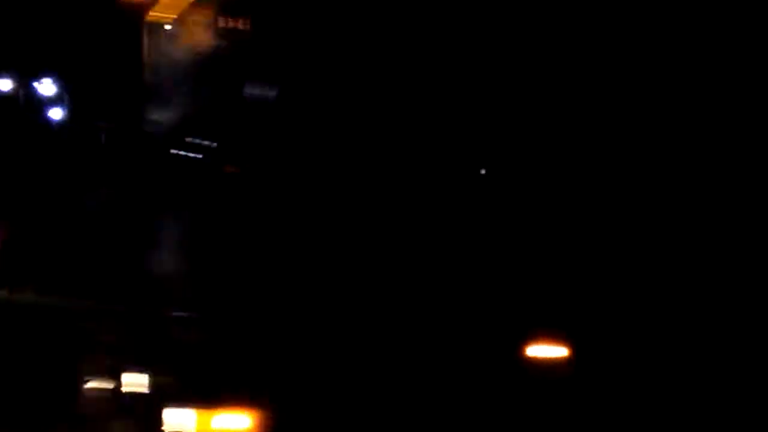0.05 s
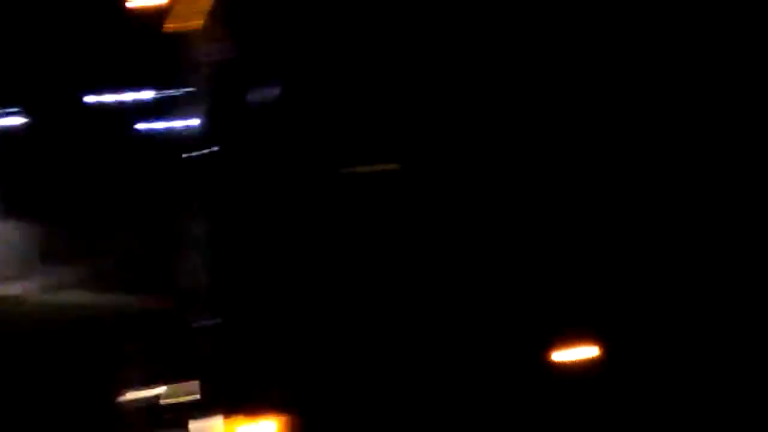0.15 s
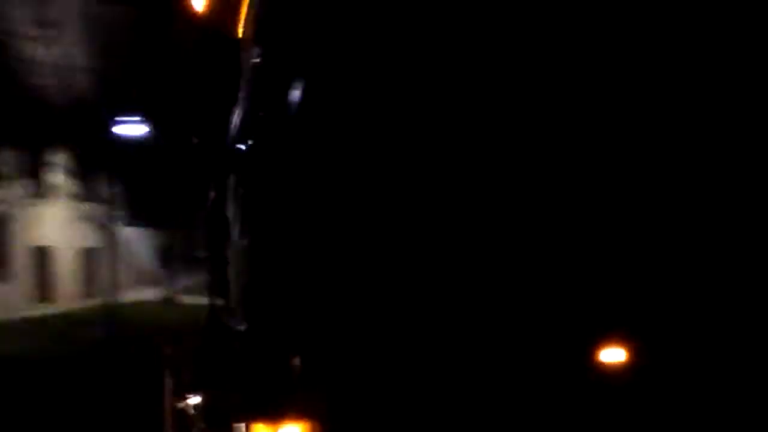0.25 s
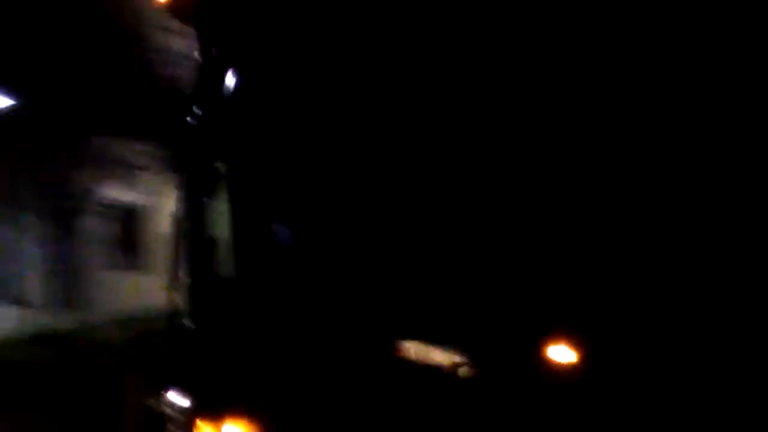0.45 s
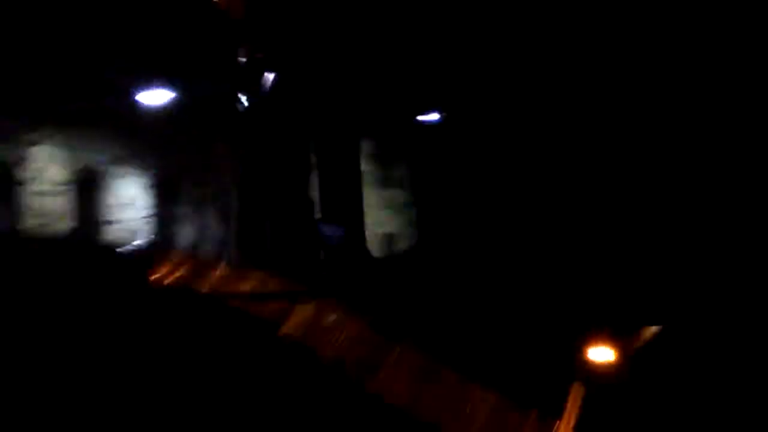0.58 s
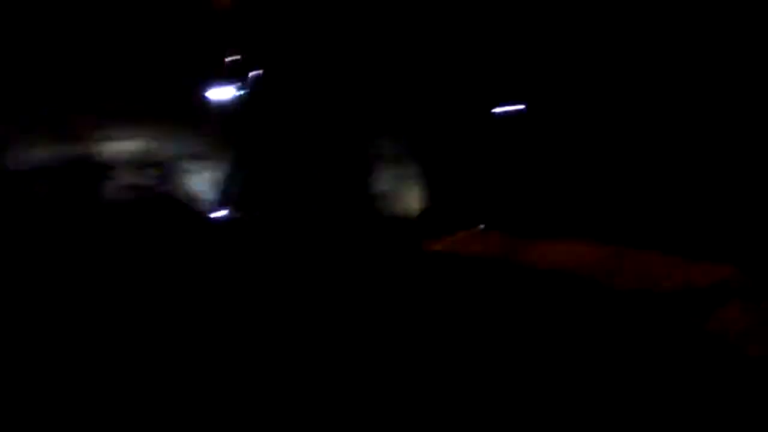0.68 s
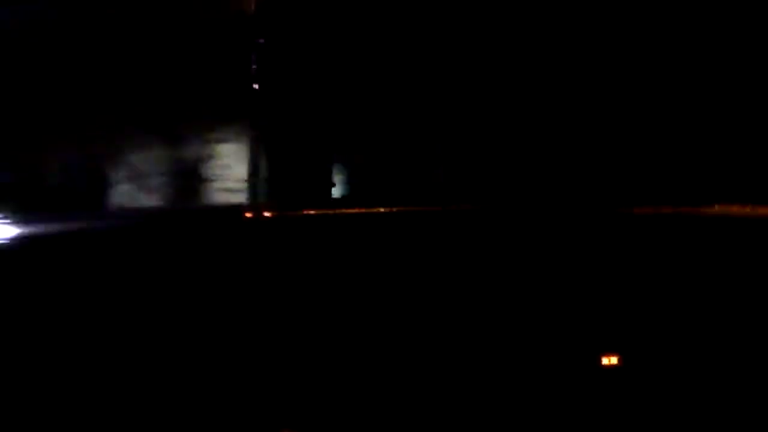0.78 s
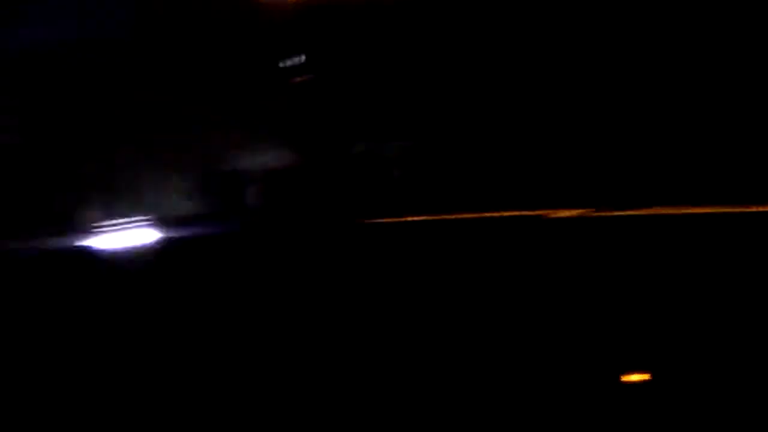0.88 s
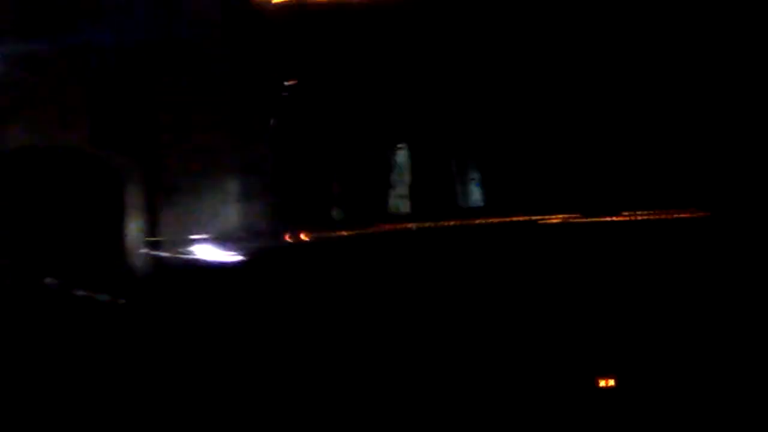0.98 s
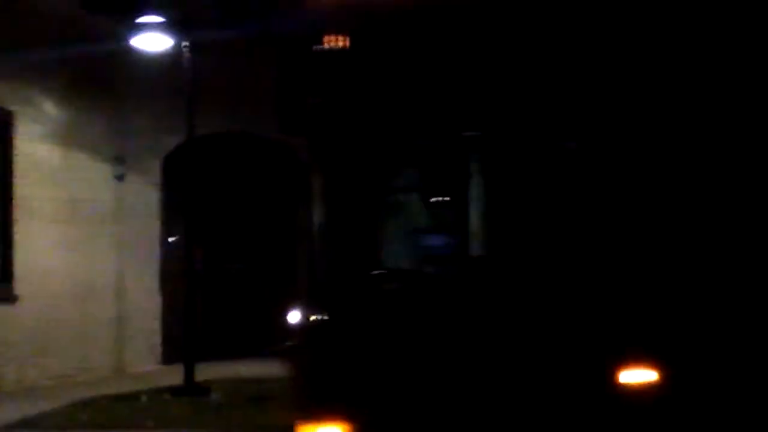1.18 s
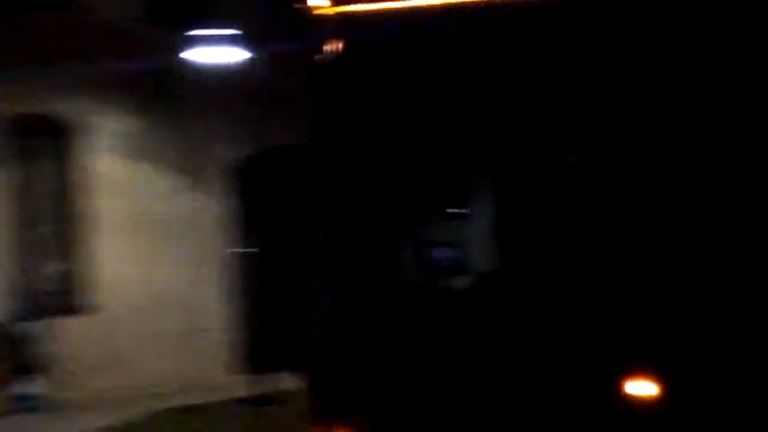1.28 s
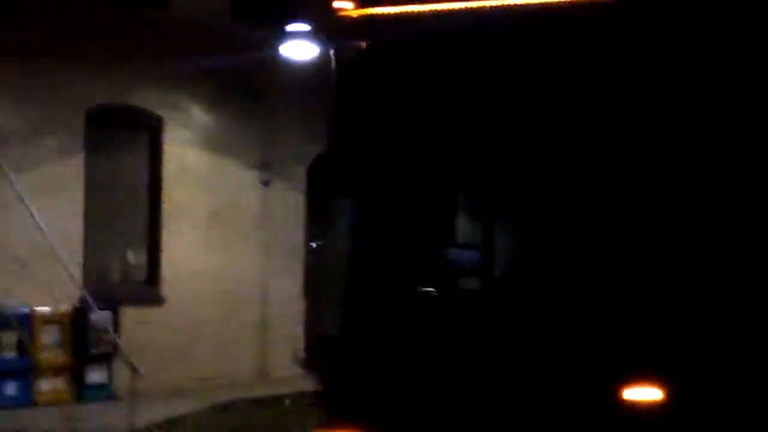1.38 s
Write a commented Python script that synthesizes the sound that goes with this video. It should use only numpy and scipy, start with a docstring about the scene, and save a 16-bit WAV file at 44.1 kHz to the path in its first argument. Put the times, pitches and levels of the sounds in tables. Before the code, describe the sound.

A bus brake squeals, high and uneven, over road rumble on a night street.

```python
"""Bus braking at night

A bus rolls past with its brakes on, heard from a car close by. Friction drives one brake mode
near 8.8 kHz, surging as the lining grabs; weaker modes come and go, and the street scatters them.
Underneath: road noise, tyre noise and hum, engine drone, rubbing hiss, rings and dull car-body bumps."""
import sys
import numpy as np
from scipy import signal
from scipy.fft import rfft, irfft, next_fast_len
from scipy.io import wavfile
from scipy.ndimage import map_coordinates

SR = 44100
rng = np.random.default_rng(int(sys.argv[2]) if len(sys.argv) > 2 else 0)


def store_wav(level_fs):
    """Save 16-bit WAV to argv[1]."""
    pcm = np.round(np.clip(np.atleast_2d(level_fs), -1, 1) * 32767)
    wavfile.write(sys.argv[1], SR, pcm.T.astype(np.int16))


N = 63945

# Noise spectra. Each row: frequency in Hz, relative density in dB.
RUMBLE_SPECTRUM = [(36, 3), (50, -4.5), (75, -2), (100, -8), (133, -12.5), (190, -17)]
ROAR_SPECTRUM = [(125, -0.5), (180, -2), (237, 4), (275, -3), (380, 1), (430, -4), (500, -12.5)]
TYRE_SPECTRUM = [(300, -45), (480, -8.5), (620, -2), (860, -0.5), (1010, 0), (1130, -14.5), (1800, -16.5),
                 (2300, -15.5), (3200, -23), (4000, -24), (5000, -18)]
HISS_SPECTRUM = [(2500, -50.5), (3800, -4.5), (5200, -5.5), (6600, 3.5), (7800, 0.5), (9500, -2.5),
                 (12000, -11), (14200, -12)]
RATTLE_SPECTRUM = [(100, -23), (160, 7.5), (240, 2), (390, -3), (520, -17), (1200, -20), (4000, -40)]
# Tyre noise resonances. Each row: centre in Hz, width in Hz, boost in dB.
TYRE_RESONANCES = [(1470, 130, 4), (2490, 100, 4), (2710, 140, 5), (4380, 520, 6)]
# Envelopes. Each row: time in seconds, level in dB.
RUMBLE_ENVELOPE_DB = [(0, -45), (.17, -42), (.3, -54.5), (.42, -55), (.56, -45), (.7, -53.5), (1.05, -44),
                      (1.32, -49), (1.45, -59)]
ROAR_ENVELOPE_DB = [(0, -50.5), (.13, -50.5), (.25, -50), (.55, -57), (.8, -52), (1.1, -52.5),
                    (1.33, -54.5), (1.45, -45.5)]
TYRE_ENVELOPE_DB = [(0, -54.5), (.2, -55), (.4, -53), (.85, -53.5), (1.1, -55.5), (1.35, -57.5),
                    (1.45, -55)]
HISS_ENVELOPE_DB = [(0, -59), (.06, -59.5), (.085, -56), (.12, -60), (.4, -58.5), (.85, -57.5), (1.05, -60),
                    (1.33, -63), (1.45, -61.5)]
SQUEAL_ENVELOPE_DB = [(.13, -79), (.165, -54.5), (.225, -47), (.26, -32), (.39, -32.5), (.5, -38.5),
                      (.57, -36.5), (.6, -50), (.74, -45.5), (.78, -41.5), (.91, -46), (.97, -59),
                      (1.0, -76)]
# Engine tones. Each row: pitch in Hz, level in dB.
ENGINE_TONES = [(46, -57), (73, -57)]
# Ringing resonances of the tyre noise. Each row: pitch in Hz, level in dB re the tyre envelope.
TYRE_RINGS = [(1480, -15), (2200, -18), (2730, -14), (4250, -19), (4520, -17)]
# Car-body jolts. Each row: start in seconds, boom level in dB, pitch in Hz, T60 in seconds,
# rattle level in dB.
BODY_JOLTS = [(0.054, -36, 85, 0.14, -63), (.094, -34.5, 146, .17, -33), (0.159, -35, 68.4, 0.22, -38.5),
              (.345, -46, 225, 0.19, -48.5), (.445, -43.5, 285, 0.13, -53), (0.599, -43, 324, 0.14, -60),
              (0.816, -42.5, 239, 0.17, -46), (0.945, -26.5, 52.6, 0.16, -39.5),
              (.993, -37, 170, 0.07, -58)]
# Brief brake modes. Each row: start and end in seconds, pitch in Hz, level in dB, rough share 0-1.
BRAKE_CHIRPS = [ (.10, .36, 2720, -66, .7), (.36, .66, 2650, -62, .8), (.37, .47, 10225, -55.5, .85),
                (.48, .82, 2490, -65, .8), (.56, .93, 6540, -67, .8), (.735, .925, 11105, -52, .99),
                (.83, 1.03, 1460, -62, .6), (1.04, 1.15, 11130, -70, .99), (1.12, 1.24, 2715, -63, .5),
                (1.16, 1.26, 8925, -58, .25), (1.30, 1.44, 4230, -64, .99), (1.30, 1.322, 4400, -57, .6),
                (1.315, 1.39, 8345, -54, .25), (1.385, 1.5, 8330, -44, .1), (1.405, 1.445, 2700, -54, .05),
                (1.405, 1.45, 10435, -51, .6)]
# Grabs of the lining. Each row: peak time in seconds, half width in seconds, level in dB.
LINING_GRABS = [(0.2543, 0.0085, -17.5), (0.344, 0.0091, -22.5), (.378, .013, -32), (0.409, 0.013, -19.5),
                (0.459, 0.0065, -21.5), (0.487, .012, -23.5), (0.802, 0.0088, -34.5)]
# Modes driven with the main one. Each row: pitch in Hz, level in dB re the main mode.
COMPANION_MODES = [(7197, -34.5), (13227, -44)]
# Tyre hum. Each row: time in seconds, band centre in Hz, level in dB.
TYRE_HUM_TRACK = [(.27, 990, -72), (.305, 970, -53), (.37, 880, -57), (.56, 865, -55), (.68, 830, -56),
                  (.76, 880, -57), (.83, 930, -52.5), (1.04, 960, -55), (1.13, 950, -56), (1.22, 900, -68)]

BUMP_ATTACK_S, RATTLE_T60_S = .005, .12
CHIRP_EDGE_S, CHIRP_FLUTTER_DB = .02, 2
SQUEAL_HZ, SAG_HZ_PER_DB, SAG_FROM_DB = 8865, 2.9, -48
STREET_T60_S, STREET_DB, STREET_DELAY_S = .22, -17, .008
LOW_CUT_HZ, TOP_HZ = 33, 14300
TIME_S = np.arange(N) / SR


def amp(db):
    """Decibels to gain."""
    return 10 ** (np.asarray(db) / 20)


def unit_rms(x):
    """Scale to rms 1."""
    return x / np.sqrt(np.mean(x ** 2) + 1e-20)


def curve(rows):
    """Join (seconds, value) points with straight lines."""
    return np.interp(TIME_S, *np.transpose(rows))


def wobble(rate_hz):
    """Smooth random curve through unit-variance knots."""
    return map_coordinates(rng.standard_normal(2048), [TIME_S * rate_hz + 2], mode="wrap")


def filtered(x, response):
    """Zero-phase filter; response maps Hz to gain."""
    size = next_fast_len(N + SR // 2)
    return irfft(rfft(x, size) * response(np.fft.rfftfreq(size, 1 / SR)), size)[..., :N]


def noise(spectrum, resonances=()):
    """Coloured noise of rms 1 with steep skirts and optional resonances."""
    knots_hz, knots_db = np.transpose(spectrum)

    def gain(hz):
        db = np.interp(np.log(hz + 1), np.log(knots_hz), knots_db)
        for centre_hz, width_hz, boost_db in resonances:
            db += boost_db / (1 + (2 * (hz - centre_hz) / width_hz) ** 2)
        low_pass = 1 / (1 + (hz / knots_hz[-1] / 1.15) ** 16)
        high_pass = 1 / (1 + (knots_hz[0] / (hz + 1)) ** 4)
        return amp(db) * low_pass * high_pass
    return unit_rms(filtered(rng.standard_normal(N), gain))


def phase_rad(hz):
    """Running phase of a fixed or moving pitch, from a random start."""
    return 2 * np.pi * (np.cumsum(np.broadcast_to(hz, N)) / SR + rng.random())


def rough_tone(hz, rough_share, width_hz=90):
    """Tone of rms 1; uneven friction smears a share of its power about the pitch."""
    def smear():
        return unit_rms(filtered(rng.standard_normal(N), lambda f: np.exp(-f / width_hz)))
    phase = phase_rad(hz)
    share = np.clip(rough_share, 0, 1)
    pure = np.sqrt(2) * np.sin(phase)
    rough = smear() * np.sin(phase) + smear() * np.cos(phase)
    return np.sqrt(1 - share) * pure + np.sqrt(share) * rough


def road_noise():
    """Road and body rumble, hollow road roar, tyre noise and thin rubbing hiss."""
    rumble = amp(curve(RUMBLE_ENVELOPE_DB)) * noise(RUMBLE_SPECTRUM)
    roar = amp(curve(ROAR_ENVELOPE_DB) + 1.5 * wobble(44.84)) * noise(ROAR_SPECTRUM)
    tyres = amp(curve(TYRE_ENVELOPE_DB) + .7 * wobble(59.44)) * noise(TYRE_SPECTRUM, TYRE_RESONANCES)
    hiss = amp(curve(HISS_ENVELOPE_DB) + .4 * wobble(80)) * noise(HISS_SPECTRUM)
    return rumble + roar + tyres + hiss


def engine_drone():
    """Low engine tones, slightly unsteady in level and pitch."""
    out = np.zeros(N)
    for hz, db in ENGINE_TONES:
        gain = amp(db + 1.5 * wobble(2.7))
        pitch_hz = hz * (1 + .03 * wobble(12))
        out += gain * np.sqrt(2) * np.sin(phase_rad(pitch_hz))
    return out


def tyre_rings():
    """Resonances of the tyre noise ring faintly, each wavering on its own."""
    out = np.zeros(N)
    for hz, db in TYRE_RINGS:
        gain = amp(db + 4 * wobble(40))
        pitch_hz = hz * (1 + .018 * wobble(25))
        out += gain * rough_tone(pitch_hz, rough_share=.85)
    return amp(curve(TYRE_ENVELOPE_DB)) * out


def body_bumps():
    """Each jolt of the car body gives a damped boom and a muffled rattle."""
    out = np.zeros(N)
    for start_s, boom_db, hz, t60_s, rattle_db in BODY_JOLTS:
        age_s = np.maximum(TIME_S - start_s, 0)
        attack = 1 - np.exp(-age_s / BUMP_ATTACK_S)
        boom = amp(boom_db - 60 * age_s / t60_s) * np.sqrt(2) * np.sin(2 * np.pi * hz * age_s)
        rattle = amp(rattle_db - 60 * age_s / RATTLE_T60_S) * noise(RATTLE_SPECTRUM)
        out += attack * (boom + rattle)
    return out


def brake_chirps():
    """Weaker brake modes lock in briefly, some pure, some rasping."""
    out = np.zeros(N)
    for start_s, end_s, hz, db, rough_share in BRAKE_CHIRPS:
        inside_s = np.minimum(TIME_S - start_s, end_s - TIME_S)
        gate = np.clip(.5 + inside_s / (2 * CHIRP_EDGE_S), 0, 1) ** 2
        out += gate * amp(db + CHIRP_FLUTTER_DB * wobble(55)) * rough_tone(hz, rough_share)
    return out


def brake_squeal():
    """Friction keeps one mode singing; each grab makes it louder, purer and slightly lower."""
    held = amp(curve(SQUEAL_ENVELOPE_DB))
    grabs = sum(amp(db) * np.exp(-((TIME_S - peak_s) / half_width_s) ** 2)
                for peak_s, half_width_s, db in LINING_GRABS)
    envelope = held + grabs
    excess_db = np.maximum(20 * np.log10(envelope) - SAG_FROM_DB, 0)
    pitch_hz = SQUEAL_HZ - SAG_HZ_PER_DB * excess_db
    companions = sum(amp(db) * rough_tone(hz, rough_share=.62) for hz, db in COMPANION_MODES)
    main_mode = rough_tone(pitch_hz, rough_share=.5 * (held / envelope) ** 1.8)
    return envelope * (main_mode + companions)


def street_echo(source):
    """Walls and the bus's side return a short scattered echo that changes as the bus moves."""
    lag_s = np.arange(SR // 3) / SR
    decay = amp(-60 * lag_s / STREET_T60_S) * np.clip(lag_s / STREET_DELAY_S - 1, 0, 1)
    centres_s, step_s = np.linspace(0, N / SR, num=12, retstep=True)
    out = np.zeros(N)
    for centre_s in centres_s:
        tail = decay * rng.standard_normal(len(lag_s))
        crossfade = np.sqrt(np.clip(1 - abs(TIME_S - centre_s) / step_s, 0, 1))
        out += signal.fftconvolve(source * crossfade, tail / np.linalg.norm(tail))[:N]
    return out


def tyre_hum():
    """A coarse band of tyre noise around 900 Hz, surging unevenly."""
    track = np.array(TYRE_HUM_TRACK)
    centre_hz = curve(track[:, :2])
    level_db = curve(track[:, [0, 2]]) + 4.5 * wobble(55)
    return amp(level_db) * rough_tone(centre_hz, rough_share=.9, width_hz=75)


def scene():
    """Brakes and their echo over the traffic noise, same in both channels."""
    brakes = brake_squeal() + brake_chirps()
    echo = amp(STREET_DB) * street_echo(brakes)
    mono = brakes + echo + tyre_hum() + tyre_rings() + road_noise() + engine_drone() + body_bumps()
    return np.array([mono, mono])


def record(dry):
    """Roll off the deepest bass; cut everything above TOP_HZ."""
    return filtered(dry, lambda hz: (hz < TOP_HZ) / (1 + (LOW_CUT_HZ / (hz + 1)) ** 8))


dry = scene()
out = record(dry)
store_wav(out)
```